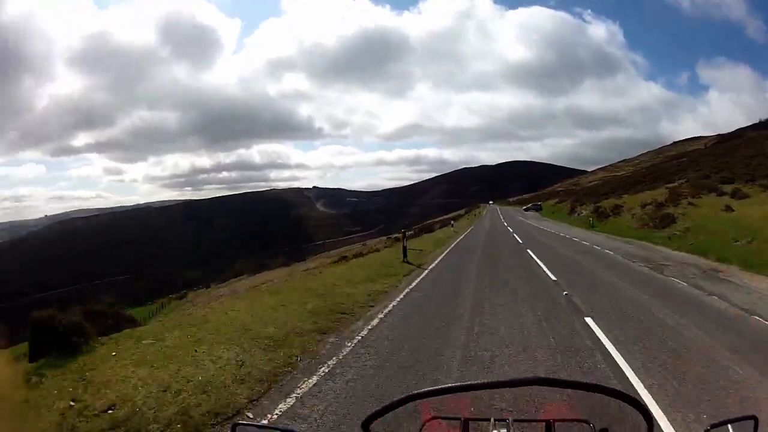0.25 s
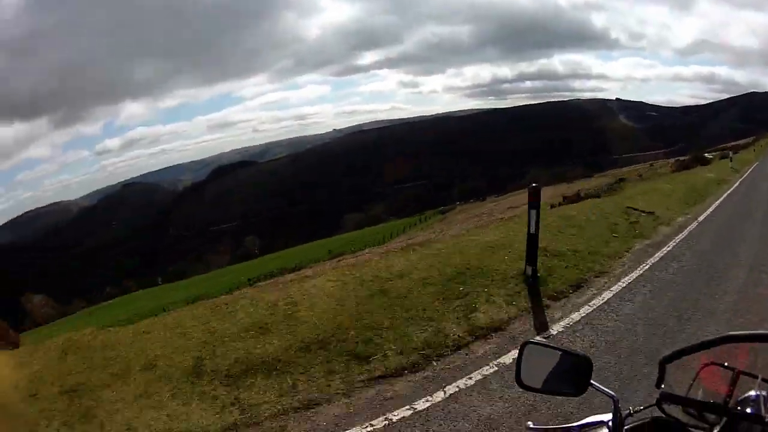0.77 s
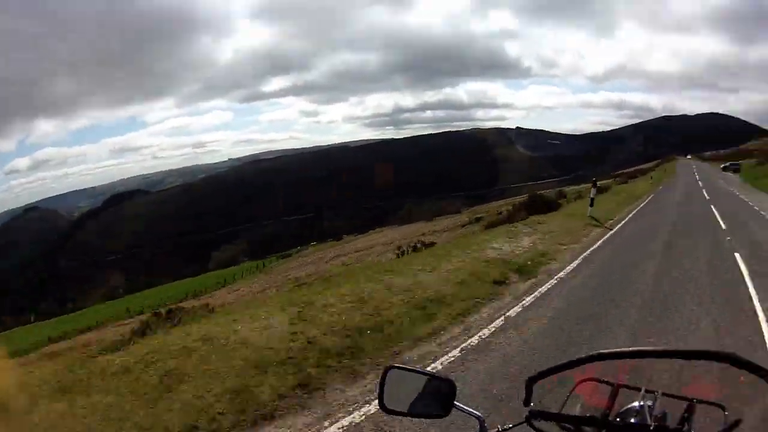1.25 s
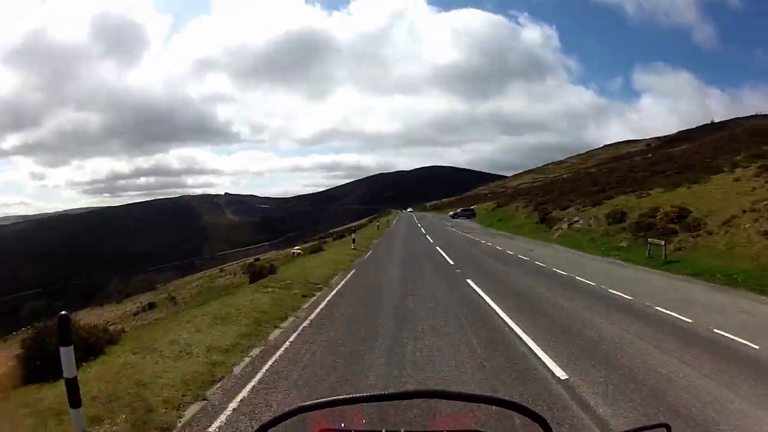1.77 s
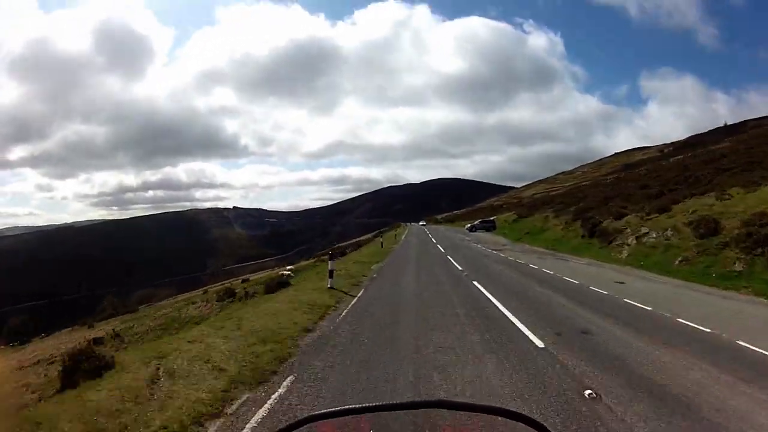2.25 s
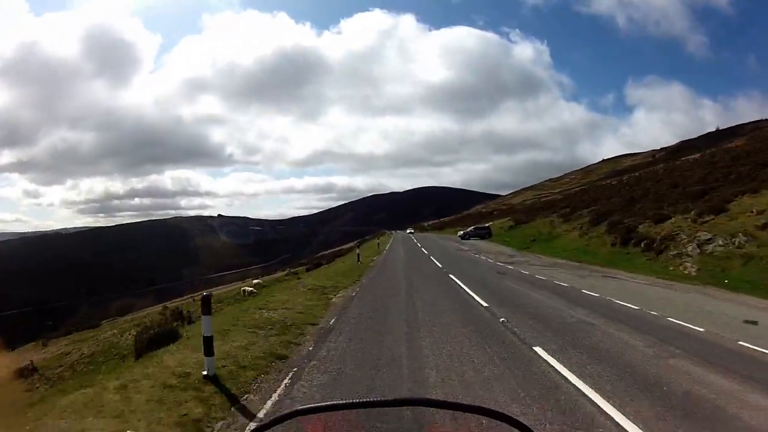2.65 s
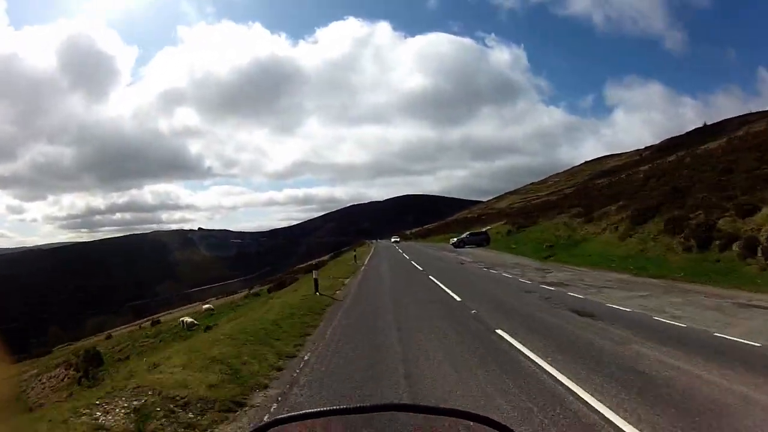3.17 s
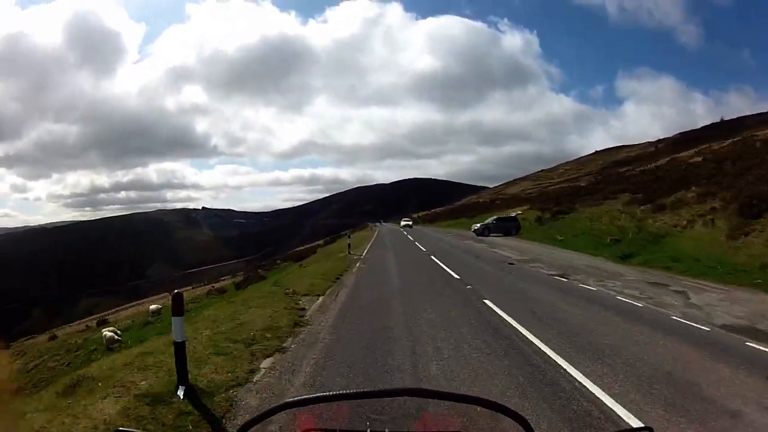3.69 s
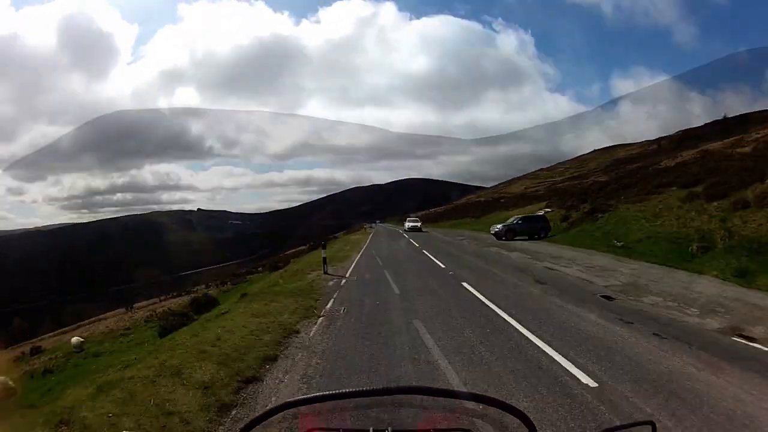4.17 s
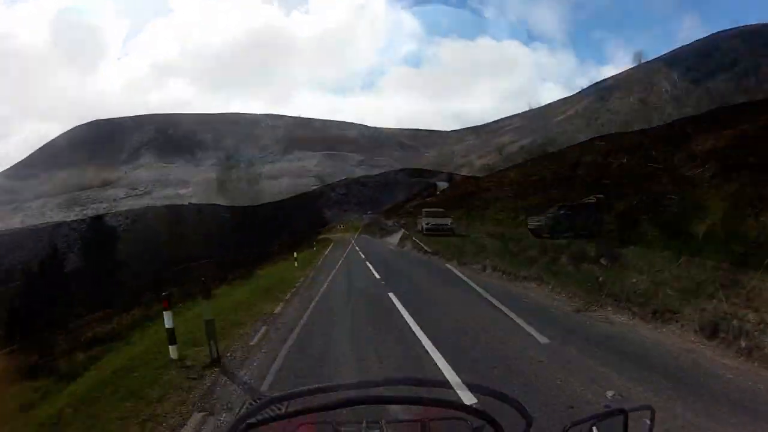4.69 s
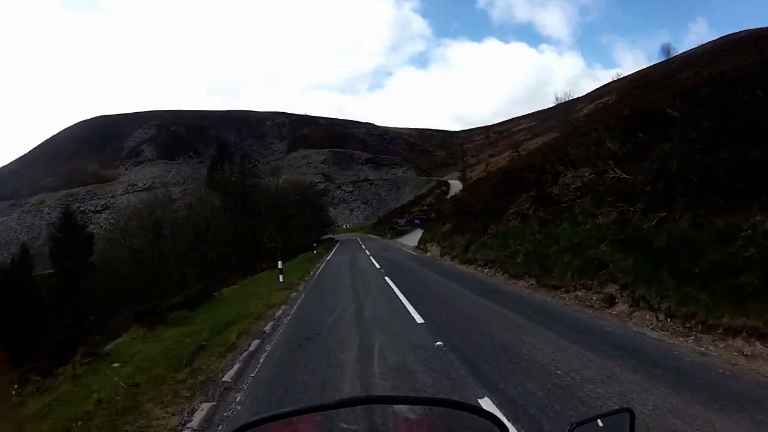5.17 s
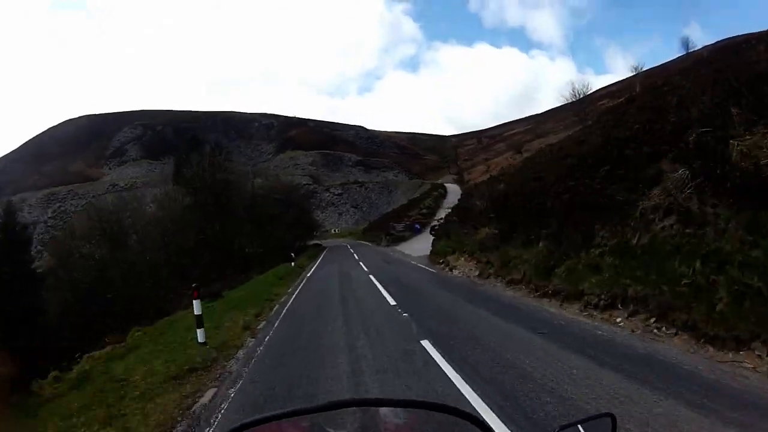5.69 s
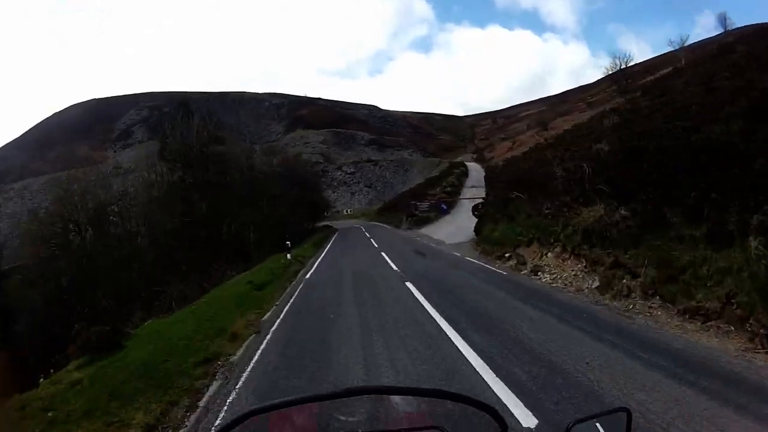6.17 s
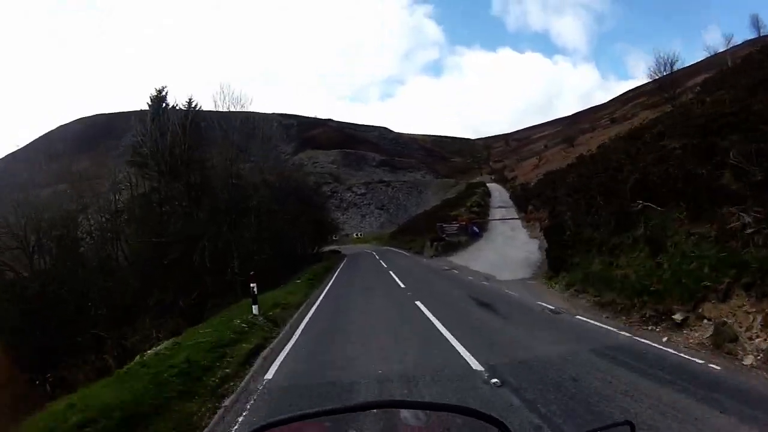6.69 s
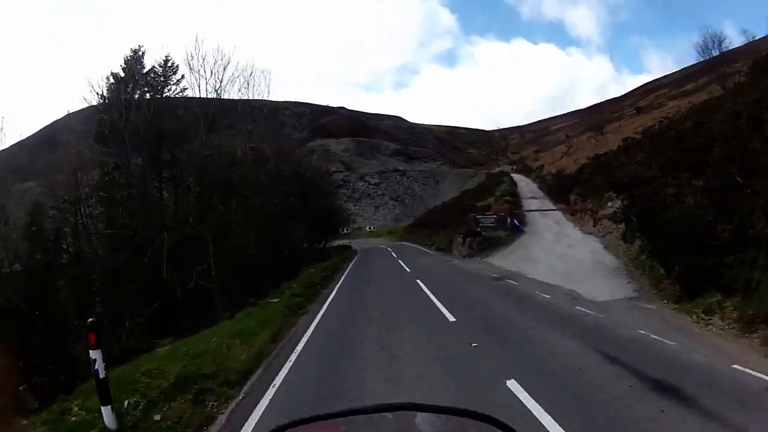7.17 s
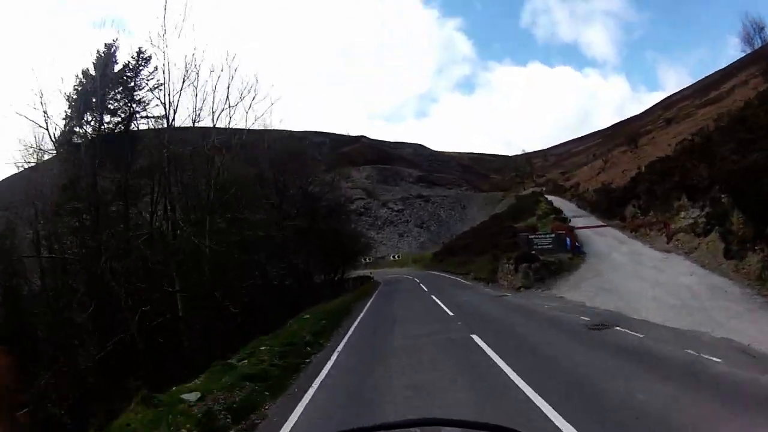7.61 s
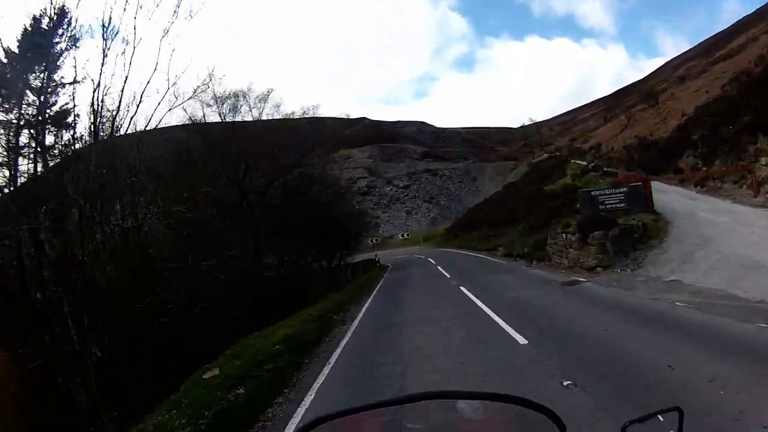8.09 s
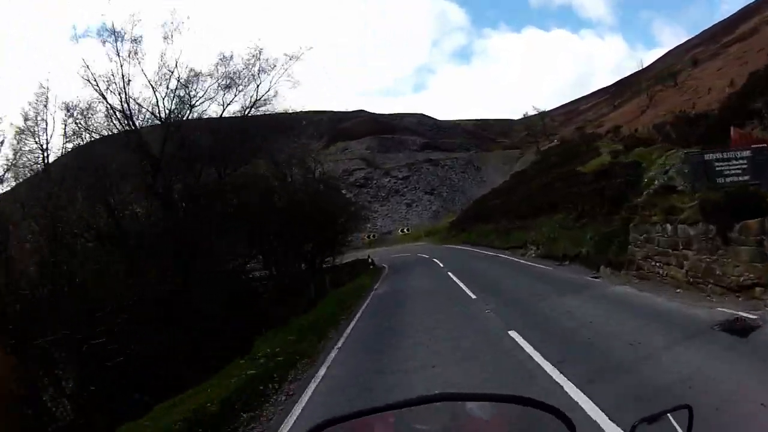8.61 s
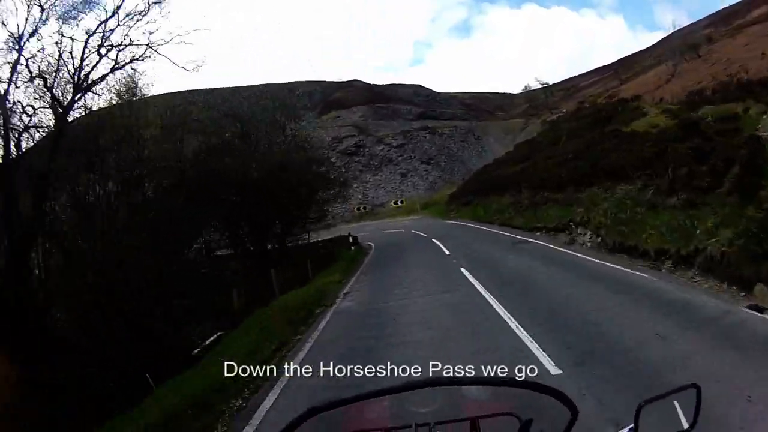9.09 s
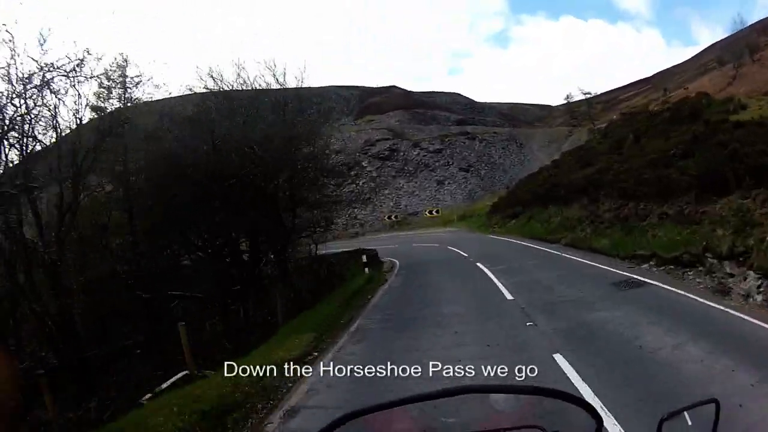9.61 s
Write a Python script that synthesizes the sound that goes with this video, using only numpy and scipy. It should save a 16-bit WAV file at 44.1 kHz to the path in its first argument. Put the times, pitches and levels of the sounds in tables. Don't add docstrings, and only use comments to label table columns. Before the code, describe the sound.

Fast motorcycle ride with overloaded, sputtering wind roar and steady engine drone, switching abruptly to quieter wind with a slowly falling engine note.

```python
import sys
import numpy as np
from scipy import signal
from scipy.fft import rfft, irfft
from scipy.io import wavfile
from scipy.ndimage import uniform_filter1d

SR = 44100
rng = np.random.default_rng(int(sys.argv[2]) if len(sys.argv) > 2 else 0)


def to_linear_factor(level_db):
    exponent = np.asarray(level_db, float) / 20
    return 10 ** exponent


def master(y):
    cut = np.clip(np.atleast_2d(y).T, -1, 1)
    pcm = np.round(cut * 32767)
    wavfile.write(sys.argv[1], SR, pcm.astype(np.int16))


N = 434385
TIME = np.arange(N) / SR
HZ = np.maximum(np.fft.rfftfreq(N, 1 / SR), 1)
FAST_ENDS_S, CALM_STARTS_S = 5.005, 4.494
RAIL, LOW_CUT_HZ = 1.0, 213


def in_time(rows):
    s, *columns = np.transpose(rows)
    return [np.interp(TIME, s, column) for column in columns]


def drift(rate_hz):
    r = np.exp(-80 * np.pi * rate_hz / SR)
    noise = rng.standard_normal(N // 40 + 2002)
    slow = signal.lfilter([1], [1, -2 * r, r * r], noise)[2000:]
    return np.interp(np.arange(N) / 40, np.arange(len(slow)), slow / slow.std())


def before_low_cut(hz):
    return np.sqrt(1 + (LOW_CUT_HZ / hz) ** 2)


ZONE_EDGES_HZ = [20, 80, 600, 2500, 9500]
# frequency in Hz, density in dB per Hz.
COLOUR_FAST = [(8, -11), (25, -1.5), (80, -2), (250, -11.5), (600, -15), (1200, -26), (2300, -37.5),
               (3300, -38.5), (3750, -39.5), (5200, -45), (9000, -46.5), (10500, -48.5), (11500, -58),
               (14500, -52)]
COLOUR_CALM = [(7, -14.5), (18, 2), (55, -5), (130, -6), (188, -3.5), (260, -7), (600, -12), (1200, -23.5),
               (2300, -36), (3300, -40), (3750, -38), (5200, -44), (9000, -47.5), (14500, -60)]


def wind(levels_db, colour, gust_db, patchy_db):
    colour_hz, colour_db = np.transpose(colour)
    shape = to_linear_factor(np.interp(np.log(HZ), np.log(colour_hz), colour_db))
    edges = np.array(ZONE_EDGES_HZ)
    inside = [(HZ >= low) & (HZ < high) for low, high in zip(edges, edges[1:])]
    zone_rms = [np.sqrt(2 / N * np.sum(shape[zone] ** 2)) for zone in inside]
    lift_db = levels_db - 20 * np.log10(zone_rms)[:, None]
    zone_octaves = np.log2(edges[:-1] * edges[1:]) / 2
    noise = rfft(rng.standard_normal(N)) * shape * before_low_cut(HZ)
    gust = drift(13.4)
    air = 0
    for octave in np.arange(3., 15.):
        window = np.cos(np.pi / 2 * np.clip(np.log2(HZ) - octave, -1, 1)) ** 2
        share = [np.interp(octave, zone_octaves, one) for one in np.eye(4)]
        depth = np.clip((octave - 6.0) / 27.0, 0, 1)
        level_db = share @ lift_db + depth * gust_db * gust + patchy_db * drift(9.8)
        air = air + irfft(noise * window, N) * to_linear_factor(level_db)
    return air


# time in seconds, strength in dB.
WIND_FAST = [(0, 4), (.15, 5.5), (.3, 1.5), (.5, 1), (.61, 15.5), (.72, 17.5), (.82, 3), (1.1, 4.5),
             (1.38, -2), (1.68, 10), (2.15, 3), (2.66, 1), (3.1, 0), (3.62, 1), (4.26, -3), (4.45, -3),
             (4.6, -5.5), (5, -2.5)]
WIND_CALM = [(5.05, 5), (5.3, -0.5), (5.7, -1.5), (6.25, 3.5), (6.65, 1), (7.1, 1.5), (7.6, 3), (8.4, 0.5),
             (9.2, -1), (9.5, -2.5), (9.85, -0.5)]
# mean in dB, share of the gust, lift in dB while the head is turned, drift in dB per s, share of the puffs.
ZONES_FAST = [
    (-18.5, -0.15, 4, 0, 0),
    (-15.5, 1, -0.3, 0.35, 0),
    (-31, 0.22, 5, 0.63, 0.37),
    (-49.5, 0.055, 8, -0.47, 0.22),
]
ZONES_CALM = [
    (-28, 0.54, 0, -0.13, 0),
    (-21.5, 0.54, 0, .01, 0),
    (-37.5, 0.72, 0, -0.55, 0),
    (-55.5, 0.4, 0, 0.29, 0.52),
]


def zone_levels(gusts, zones):
    from_middle_s = TIME - (gusts[0][0] + gusts[-1][0]) / 2
    return np.array(zones) @ [np.ones(N), in_time(gusts)[0], head_turned(), from_middle_s, puffs_db()]


def head_turned():
    turns_s, turn_takes_s = 0.45, 0.1
    back_s, back_takes_s = 1.337, 0.14
    return np.clip(np.minimum((TIME - turns_s) / turn_takes_s, 1 - (TIME - back_s) / back_takes_s), 0, 1)


# middle in seconds, lift in dB, half length in s, share that reaches the sizzle.
PUFFS = [
    (2.34, 13, 0.13, .2),
    (3.15, -1, .15, 1),
    (6.45, 6.5, .35, .1),
    (7.39, 7.5, .05, 1.6),
    (7.6, 3, .2, .3),
    (8.4, 7, .4, .3),
    (9.1, 1, .2, 2),
    (9.57, 0, 0.13, 1.5),
]


def puffs_db(fine=False):
    return sum(db * share ** fine * np.maximum(1 - abs(TIME - s) / half_s, 0) for s, db, half_s, share in PUFFS)


# mean in dB, lift in dB while the head is turned, drift in dB per s.
SIZZLE_FAST = (-56, 3.6, -2)
SIZZLE_CALM = (-61, 0, 1.7)


def sizzle(low_hz, level, middle_s):
    mean_db, turn_db, db_per_s = level
    high_pass = signal.butter(2, low_hz, "high", fs=SR, output="sos")
    hiss = signal.sosfilt(high_pass, rng.standard_normal(N))
    level_db = mean_db + turn_db * head_turned() + db_per_s * (TIME - middle_s)
    level_db = level_db + puffs_db(fine=True) + 2.2 * drift(22.0)
    return to_linear_factor(level_db) * hiss / hiss.std()


# start in seconds, hold in ms with the sign
# of the rail, rebound after ms, its hold in ms.
REBOUNDS = [(.0073, 10.3, 43.1, 8.4), (.1317, -9.3, 32.7, 12.9), (.1995, -21.5, 23.4, 24.4),
            (.3391, -16.9, 47, 7.1), (.4224, 9.7, 43.7, 9.1), (.5575, 12.8, 31.5, 13.9),
            (.6059, 10.6, 26.1, 12), (.6632, 11.6, 21.7, 18.2), (.7044, 13.1, 80.4, 9.1),
            (.8818, -19.4, 22.4, 16), (1.1015, 12.1, 14.7, 16.4), (1.1586, 12.6, 30.6, 6.6),
            (1.3449, -10.6, 16.1, 11.4), (1.5213, -13.6, 36.7, 12.8), (1.6012, -11.6, 58.4, 9.5),
            (1.6925, -10.6, 62.3, 7.8), (1.7909, -11.8, 45.5, 10.2), (1.876, -9.2, 23.7, 9.5),
            (1.9262, 20, 24.3, 17.6), (2.021, -12.6, 26.2, 9.8), (2.0592, -14, 94.6, 12.8),
            (2.2576, -17.7, 21.7, 13.8), (2.3333, 15.7, 22.4, 13), (2.3799, 8.8, 15.6, 12.6),
            (2.4251, 15.5, 21.7, 17), (2.638, -12.7, 41.8, 11.4), (2.7011, -12.4, 101, 17.2),
            (2.827, -20, 23.4, 14.6), (2.8736, -10.3, 23.1, 10.6), (2.911, -17.9, 20.5, 16.1)]
# start in seconds, hold in
# ms with the sign of the rail.
LONE = [(.6494, -8.4), (.6758, 7.4), (1.6707, 17), (2.9783, 10.5), (3.0513, 13.8), (3.0806, -9.7),
        (3.4278, -15.2), (3.6, -13.4), (3.6168, 13), (3.8582, -13.5), (3.9241, 13), (4.1244, -16.3),
        (4.2431, -13.9), (4.3057, -8.4), (5.0585, 7.5), (5.0813, -15.3), (6.0373, -9), (6.1329, 9.3),
        (6.1595, -17.5), (6.3427, -14.5), (6.4162, -7.4), (6.4763, -16.4), (6.7991, -21.2), (7.5964, -10.3),
        (7.6255, 9.8), (7.6581, -13.4), (8.1639, -13), (8.9254, -10.7), (9.2419, -8), (9.4784, -7.9)]
# time in seconds, touches per s.
TOUCHES = [(0, 40), (.5, 50), (.7, 110), (1.1, 90), (1.25, 60), (1.9, 55), (2.1, 20), (2.5, 8), (3.2, 25),
           (4.3, 22), (4.5, 2), (6, 1), (6.35, 22), (6.6, 1), (9.85, 1)]


def pinnings(pressure, from_s, to_s):
    slot_s, clear_s = .008, .002
    shortest_ms, longest_ms, turned_shortens = 1.2, 9, .7
    first = [(s, ms) for s, ms, _, _ in REBOUNDS]
    second = [(s + after / 1000, -np.sign(ms) * back) for s, ms, after, back in REBOUNDS]
    big = LONE + first + second
    big_s, big_ms = np.transpose(big)
    chance, jitter, length = rng.random((int(N / SR / slot_s) - 1, 3)).T
    s = (np.arange(len(chance)) + jitter / 4) * slot_s
    at = (s * SR).astype(int)
    turned = head_turned()[at]
    ms = shortest_ms + (longest_ms - shortest_ms) * length ** 1.5 * (1 - turned_shortens * turned)
    ends_late = s[:, None] + ms[:, None] / 1000 + clear_s > big_s
    starts_early = s[:, None] < big_s + abs(big_ms) / 1000 + clear_s
    clash = (ends_late & starts_early).any(axis=1)
    keep = (chance < np.interp(s, *np.transpose(TOUCHES)) * slot_s) & ~clash
    lean = np.sign(uniform_filter1d(pressure, size=161)[at])
    lean = np.where(turned > .5, (-1) ** np.cumsum(keep), lean)
    touches = list(zip(s[keep], (lean * ms)[keep]))
    return sorted(pin for pin in big + touches if from_s <= pin[0] < to_s)


def amplifier(pressure, pinned, relax_s):
    start_s, signed_ms = np.transpose(pinned)
    rail = RAIL * np.sign(signed_ms)
    enter = (start_s * SR).astype(int)
    hold = (abs(signed_ms) * SR / 1000).astype(int)
    leave = np.minimum(enter + hold, np.append(enter[1:] - 45, N - 1))
    n = np.arange(N)
    gap = np.searchsorted(enter, n, "right")
    since = (n - np.append(-SR, leave)[gap]) / SR / relax_s
    until = (np.append(enter, N + SR)[gap] - n) / SR / relax_s
    from_rail = np.append(0, rail - pressure[leave])[gap]
    to_rail = np.append(rail - pressure[enter], 0)[gap]
    free = np.maximum(since, 0)
    leaving = from_rail * np.exp(-free) * (1 - np.exp(-2 * until))
    arriving = to_rail * np.exp(-until) * (1 - np.exp(-2 * free))
    pull = (leaving + arriving) / (1 - np.exp(-2 * (free + until)))
    held = np.append(0, rail)[gap]
    swing = np.where(since < 0, held, pressure + pull)
    swing = turn_back(swing, reach=1 - np.exp(-3.0 * np.minimum(free, until)))
    return np.where(since < 0, held, np.clip(swing, -RAIL, RAIL))


def turn_back(pressure, reach):
    slow = uniform_filter1d(pressure, size=161)
    limit = 0.875 * RAIL
    return pressure - reach * (slow - np.clip(slow, -limit, limit)) * 1.18


def low_cut(x):
    r = np.exp(-2 * np.pi * LOW_CUT_HZ / SR)
    return signal.lfilter([1, -1], [1, -r], x - x[0])


# time in seconds, firing cycles per s, load in dB.
ENGINE_FAST = [(0, 37.8, -13), (.9, 37.9, -10), (1.25, 38.2, 0), (1.8, 38, -3), (2.2, 37.8, 0),
               (2.9, 37.8, -1), (3.4, 37.8, .5), (4.3, 37.9, 1), (5, 38, 0)]
ENGINE_CALM = [(4.5, 32.6, -16), (5.3, 31.7, -16), (5.9, 31, -16), (6.2, 30.4, -6), (6.4, 30.1, 1),
               (7.3, 29, 0), (8.3, 27.8, -1), (8.6, 27.5, -3), (8.7, 40, -18), (8.95, 43, -15),
               (9.3, 41.2, -15), (9.85, 39.3, -15)]
ORDERS_HEARD = [3, 5, 8]
# level in dB at full load, share of the load.
ORDERS_FAST = [(-31, .1), (-17.5, 1), (-43, 0)]
ORDERS_CALM = [(-25.5, 1), (-35.5, -.22), (-42, -.2)]


def engine(rows, orders):
    cycle_hz, load_db = in_time(rows)
    turns = np.cumsum(cycle_hz * (1 + .002 * drift(6.0))) / SR
    hum = 0
    for k, (db, share) in zip(ORDERS_HEARD, orders):
        level_db = db + share * load_db + 1.0 * drift(6.2)
        hum = hum + np.sqrt(2) * to_linear_factor(level_db) * before_low_cut(k * cycle_hz) * np.sin(2 * np.pi * k * turns)
    return hum


# start in
# seconds, level in dB, decay in s.
KNOCKS = [(.617, 2, .014), (.6578, 6, .008), (.716, -6, .05), (.954, -6, .012), (4.975, -16, .03),
          (5.215, -18, .02), (7.448, -20, .02), (8.875, -27, .008), (8.951, -12, .014), (9.01, -23, .01)]


def knocks(dull):
    shake = sum(to_linear_factor(db) * (TIME > s) * np.exp(-np.maximum(TIME - s, 0) / decay_s) for s, db, decay_s in KNOCKS)
    rattle = signal.lfilter([1], [1, -2 * dull, dull ** 2], rng.standard_normal(N))
    return uniform_filter1d(shake, size=130) * rattle / rattle.std()


def whine(phase):
    whine_hz, whine_db = 10519.5, -56
    field_hz, first_blank_s, blank_s = 59.94, .0122, .0016
    since = (TIME - first_blank_s) % (1 / field_hz)
    running = uniform_filter1d(1. * (since > blank_s), size=15)
    return np.sqrt(2) * to_linear_factor(whine_db) * running * np.sin(2 * np.pi * whine_hz * TIME + phase)


# time in seconds, height in full scale.
SPLICES = [
    (4.4942, 0.25),
    (5.003, -0.14),
    (5.4944, 0.092),
]


def splices():
    return low_cut(sum(height * (TIME > s) for s, height in SPLICES))


def camera_top(x):
    def below(hz):
        return signal.sosfiltfilt(signal.cheby2(8, 35, hz, fs=SR, output="sos"), x)

    faint, narrow, wide = below(14350), below(15050), below(15800)
    out = faint
    for band, opens_db in ((narrow - faint, -81 + 6 * drift(7)), (wide - narrow, -66.5)):
        loud = uniform_filter1d(band ** 2, size=2000) > to_linear_factor(2 * opens_db)
        out = out + band * uniform_filter1d(1. * loud, size=300)
    return out


def scene():
    fast_air = wind(zone_levels(WIND_FAST, ZONES_FAST), COLOUR_FAST, gust_db=2.0, patchy_db=1.0)
    calm_air = wind(zone_levels(WIND_CALM, ZONES_CALM), COLOUR_CALM, gust_db=1.5, patchy_db=.7)
    bumps = knocks(dull=.955)
    fast = fast_air + sizzle(6000, SIZZLE_FAST, FAST_ENDS_S / 2)
    fast = fast + engine(ENGINE_FAST, ORDERS_FAST) + whine(0) + bumps
    calm = calm_air + sizzle(5800, SIZZLE_CALM, 6.8)
    calm = calm + engine(ENGINE_CALM, ORDERS_CALM) + whine(2.46) + bumps
    fast = low_cut(amplifier(fast, pinnings(fast, 0, FAST_ENDS_S), relax_s=0.0052))
    calm = low_cut(amplifier(calm, pinnings(calm, CALM_STARTS_S, N / SR), relax_s=0.008))
    fast_on = np.clip((FAST_ENDS_S - TIME) / .001, 0, 1)
    calm_on = np.clip((TIME - CALM_STARTS_S) / .001, 0, 1)
    mono = fast * fast_on + calm * calm_on + splices()
    return np.array([mono, mono])


def low_pass(x):
    return signal.sosfilt(signal.butter(12, 15560, fs=SR, output="sos"), x)


def record(dry):
    mono = camera_top(np.clip(dry[0], -1, 1))
    white = rng.standard_normal((3, N))
    grit = signal.lfilter([.03], [1, -.97], white[0]) * 4.7
    grit = grit + signal.lfilter([.12], [1, -.88], white[1])
    grit = grit + 0.28 * uniform_filter1d(white[2], size=2)
    loudness = uniform_filter1d(abs(mono), size=50)
    side = to_linear_factor(-43) * loudness * 3.7 * grit * (drift(9.0) > 0)
    return low_pass(np.clip(mono + side * [[1], [-1]], -1, 1))


dry = scene()
out = record(dry)
master(out)
```